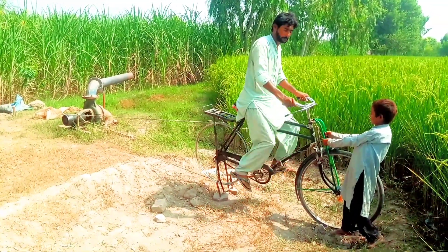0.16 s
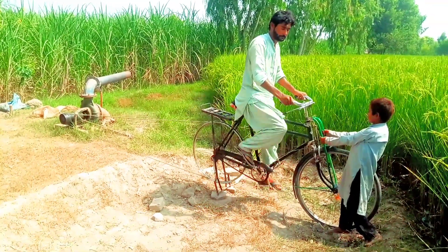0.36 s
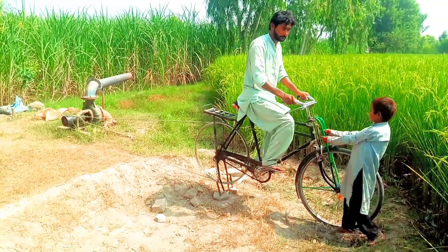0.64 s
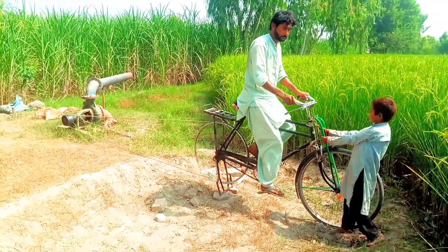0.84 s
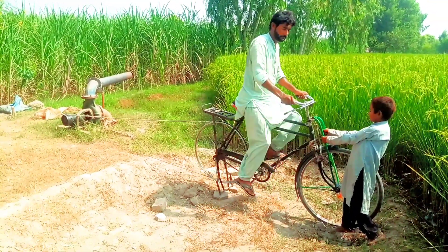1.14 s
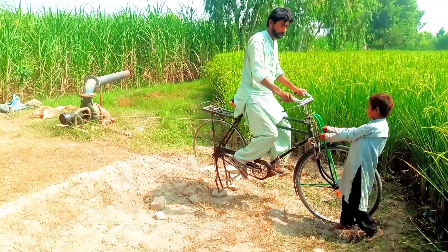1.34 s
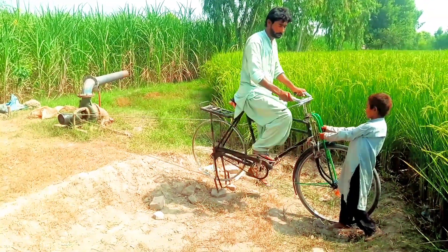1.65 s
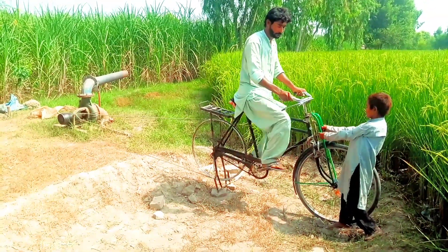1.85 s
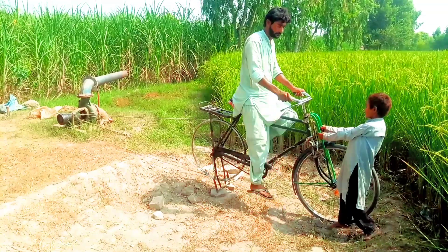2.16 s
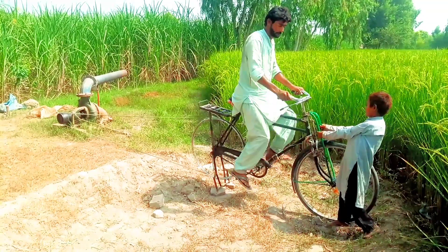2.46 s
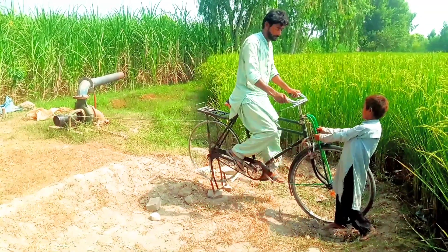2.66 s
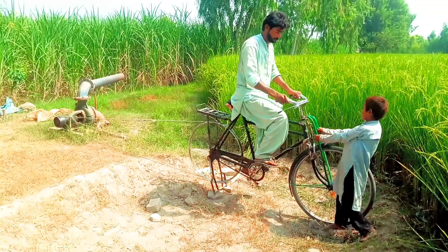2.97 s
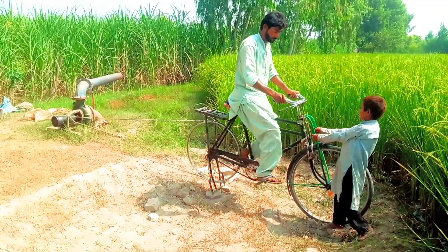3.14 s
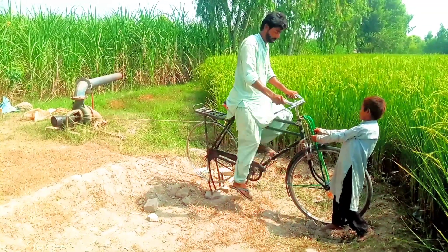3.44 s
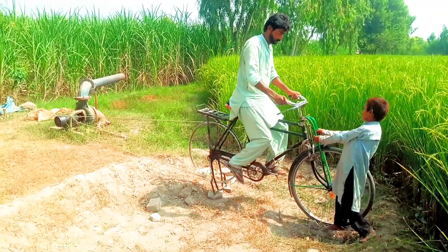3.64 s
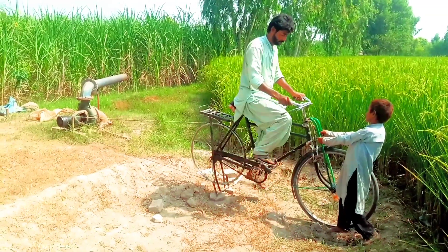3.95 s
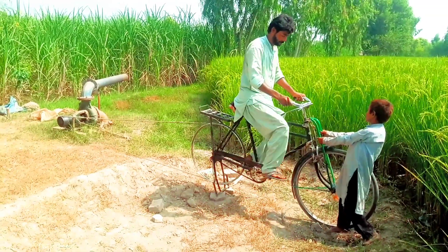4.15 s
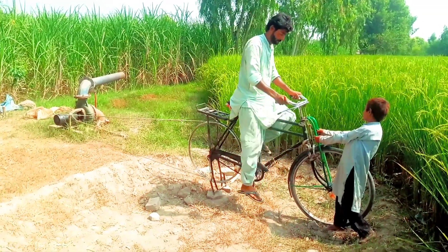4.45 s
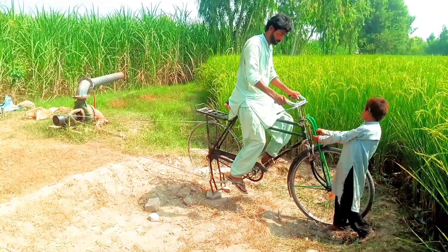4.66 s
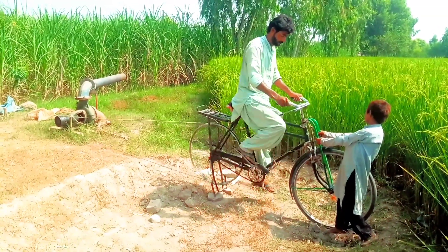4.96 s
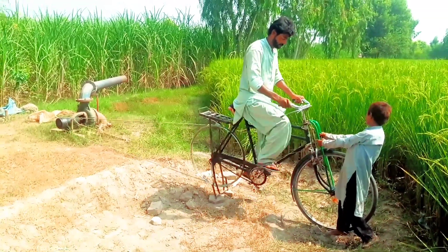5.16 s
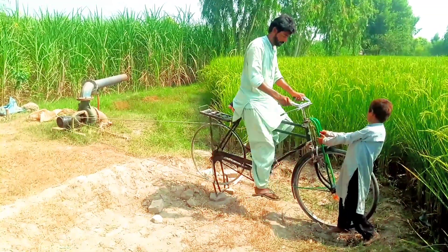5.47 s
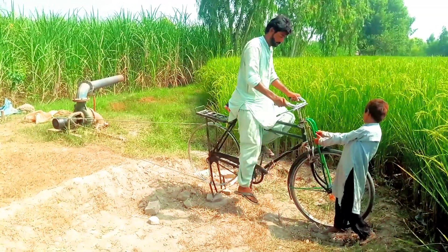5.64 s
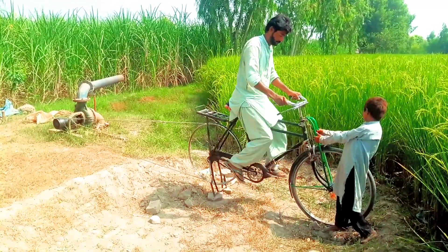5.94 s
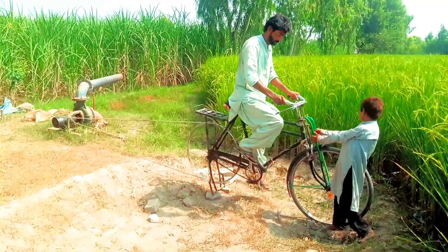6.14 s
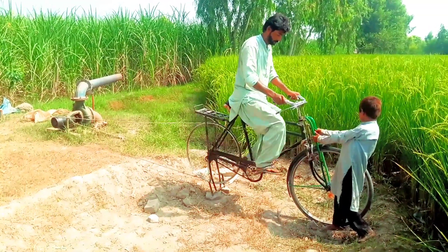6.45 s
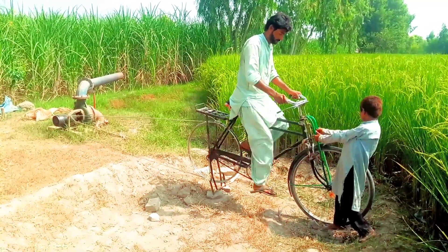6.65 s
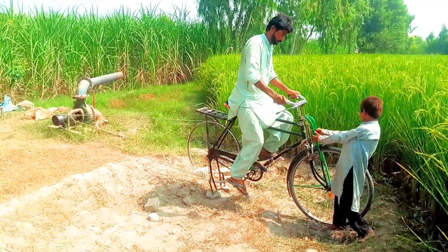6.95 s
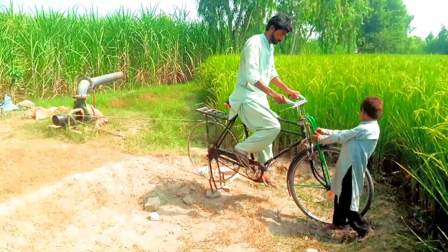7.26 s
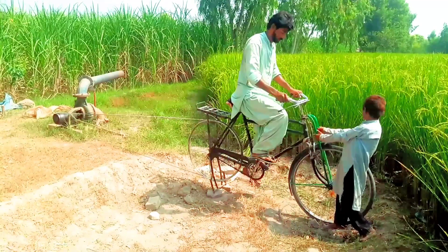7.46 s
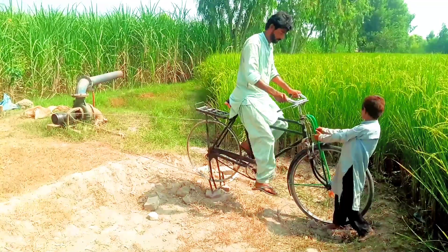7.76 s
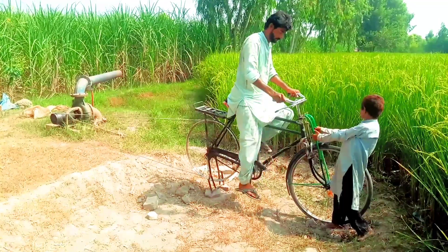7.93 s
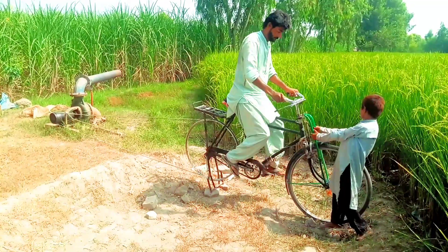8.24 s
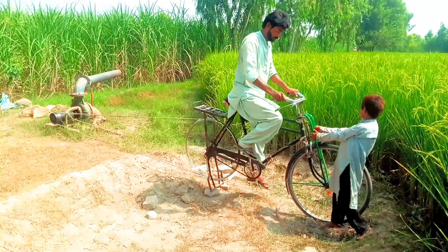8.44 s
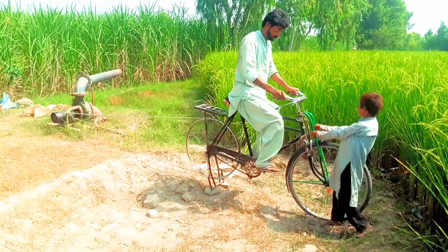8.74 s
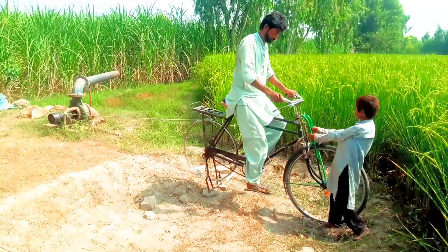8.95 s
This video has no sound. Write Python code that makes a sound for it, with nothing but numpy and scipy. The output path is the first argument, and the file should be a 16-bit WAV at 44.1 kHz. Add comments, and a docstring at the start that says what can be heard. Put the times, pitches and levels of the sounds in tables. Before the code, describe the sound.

A loose bicycle chain rattles and clashes brightly on steel in rapid pedal surges, with faint rim whirr, rope hiss and brief quiet dips outdoors.

```python
"""A loose bicycle chain rattles and clashes on steel, falling quiet for an instant when it pulls tight.
The bicycle stands in an open field and is pedalled hard; a rope round its bare rear rim turns a water pump.
Tiny random impacts ring the steel, the chain links and the rim; the rope also rubs with a noisy hiss.
A dry bearing chirps with wavering tones, the pump gulps and the stand creaks with noise through
resonances, and filtered noise makes the faint outdoor air."""
import sys
import numpy as np
from scipy import signal
from scipy.fft import rfft, irfft, next_fast_len
from scipy.io import wavfile
from scipy.ndimage import uniform_filter1d

SR = 44100
rng = np.random.default_rng(int(sys.argv[2]) if len(sys.argv) > 2 else 0)


def int16_out(signal):
    """Quantize to a 16-bit WAV file."""
    q = np.round(np.clip(np.atleast_2d(signal).T, -1, 1) * 32767)
    wavfile.write(sys.argv[1], SR, q.astype(np.int16))


N = 401294  # length in samples

# lulls while the chain is pulled tight: start_s, end_s, drop_db (change of the shaking, negative)
LULLS = [(1.29, 1.35, -2.5), (1.8, 1.853, -5), (2.32, 2.365, -4), (2.433, 2.492, -4), (3.463, 3.503, -14.5),
         (4.117, 4.147, -2), (4.564, 4.573, -5.5), (4.703, 4.75, -4.5), (5.693, 5.741, -15.5),
         (6.348, 6.415, -2.5), (6.885, 6.909, -11), (6.98, 7.072, -5), (8.017, 8.076, -13.5)]


def undb(db):
    """Turn decibels into gain."""
    return 10 ** (np.asarray(db) / 20)


def unit(x):
    """Scale to an average strength (rms) of 1."""
    return x / np.sqrt(np.mean(x ** 2))


def walk(rate):
    """Smooth random wandering, rms 1, that changes about rate times a second."""
    hold = max(int(SR / rate), 2)
    steps = np.repeat(rng.standard_normal(N // hold + 1), hold)
    return unit(uniform_filter1d(steps, hold)[:N])


def colour(x, points):
    """Filter to a given spectrum without sounding early, using the cepstrum of its log gain."""
    size = next_fast_len(N + SR // 10, True)
    point_hz, point_db = np.transpose(points)
    bin_hz = np.arange(size // 2 + 1) * SR / size
    gain_db = np.interp(np.log(bin_hz + 1), np.log(point_hz), point_db)
    cepstrum = irfft(np.log(undb(gain_db)), size)
    # folding the second half onto the first makes the response start at once
    cepstrum[1:size // 2] *= 2
    cepstrum[size // 2 + 1:] = 0
    response = np.exp(rfft(cepstrum))
    return irfft(rfft(x, size) * response, size)[:N]


def ring(x, hz, width_hz):
    """One resonance, gain 1 at its centre; the narrower it is, the longer it rings."""
    return signal.lfilter(*signal.iirpeak(hz, hz / width_hz, fs=SR), x)


def band(x, lo_hz, hi_hz, order):
    """Keep the sound between two pitches; a higher order gives steeper edges."""
    return signal.sosfilt(signal.butter(order, [lo_hz, hi_hz], "band", fs=SR, output="sos"), x)


def contacts(rate, spread_db):
    """Tiny impacts at random moments, about rate a second, of uneven size and either sign; rms 1."""
    happens = rng.random(N) < rate / SR
    size = undb(spread_db * np.clip(rng.standard_normal(N), -2, 2))
    return unit(happens * rng.choice([-1, 1], N) * size)


def strike(force, modes, wander_db, wander_rate):
    """Every impact feeds each mode differently; the place of contact wanders and favours other modes."""
    at = np.flatnonzero(force)
    out = np.zeros(N)
    weights = rng.standard_normal((len(at), len(modes)))
    places = rng.standard_normal((int(wander_rate * N / SR) + 2, len(modes)))
    for (hz, width_hz, db), weight, place in zip(modes, weights.T, places.T):
        favour = np.interp(at / SR * wander_rate, np.arange(len(place)), place)
        push = np.zeros(N)
        push[at] = force[at] * weight * undb(wander_db * favour)
        out += undb(db) * ring(push, hz, width_hz)
    return out


def fade(kicks, fall_s):
    """Each kick rises at once and dies away, to about a third in fall_s."""
    return signal.lfilter([1], [1, -np.exp(-1 / (fall_s * SR))], kicks)


def flurries(rate, fall_s, spread_db, steady):
    """Irregular surges with a sharp start, over a steady share; rms 1."""
    gap, size = rng.standard_normal((2000, 2)).T
    at = (np.cumsum(np.exp(.4 * gap)) * SR / rate).astype(int)
    inside = at < N
    kicks = np.zeros(N)
    kicks[at[inside]] = undb(spread_db * np.clip(size, -2, 2))[inside]
    return unit(steady + unit(fade(kicks, fall_s)))


def bursts(events, width_hz, swell_s):
    """Short bursts of turbulence or friction, each through one resonance twice."""
    out = np.zeros(N)
    t = np.arange(SR // 4) / SR
    for s, db, hz, ring_s in events:
        envelope = (1 - np.exp(-t / swell_s)) * np.exp(-np.log(1000) * t / ring_s)  # -60 dB in ring_s
        churn = rng.standard_normal(len(t)) * envelope
        burst = ring(ring(churn, hz, width_hz), hz, 2 * width_hz)
        start = int(s * SR)
        out[start:start + len(t)] += (undb(db) * burst / np.abs(burst).max())[:N - start]
    return out


def pedalling(column, coast_db):
    """Every stroke swells and fades in a bell shape above the level of the coasting wheel."""
    # pedal strokes: peak_s, length_s, rattle_db and whirr_db (before each sound's own trim)
    strokes = [(0.366, .62, -32.5, -53.5), (.92, 0.23, -34, -52.5), (1.506, 0.27, -33.5, -51),
               (2.15, 0.2, -31, -56), (2.748, 0.34, -33, -53), (3.21, 0.67, -34, -54),
               (3.84, 0.35, -34, -52.5), (4.358, 0.19, -32, -55), (4.896, .22, -32.5, -50),
               (5.32, 0.43, -34.5, -53.5), (6.157, 0.29, -36.5, -54.5), (6.719, .14, -28, -49),
               (7.268, 0.2, -29.5, -50.5), (7.66, 0.39, -32, -62), (8.487, 0.37, -34, -53.5),
               (8.95, .3, -42, -62)]
    rise_share = 0.49  # share of a stroke before its peak
    t = np.arange(N) / SR
    power = undb(coast_db) ** 2
    for stroke in strokes:
        since = t - stroke[0]
        width_s = stroke[1] * np.where(since < 0, rise_share, 1 - rise_share)
        power = power + undb(stroke[column]) ** 2 * np.exp(-(since / width_s) ** 2)
    return np.sqrt(power)


def slack():
    """Freedom of the chain to shake: full while loose, small while taut."""
    tighten_s = 0.048  # tension builds over this time, centred on the start of a lull, and goes at once
    t, db = np.arange(N) / SR, 0
    for start_s, end_s, drop_db in LULLS:
        tension = np.clip((t - start_s) / tighten_s + .5, 0, 1) * (t < end_s)
        db = db + drop_db * tension
    return undb(db)


def agitation():
    """How hard the chain shakes: with each stroke, and on release, the more the tighter it was."""
    recoil_db, recoil_fall_s = -49.5, 0.11  # the depth of the lull adds to the level
    kicks = np.zeros(N)
    for _, end_s, drop_db in LULLS:
        kicks[int(end_s * SR)] = undb(recoil_db - drop_db)
    return np.hypot(pedalling(column=2, coast_db=-37), fade(kicks, recoil_fall_s))


def chain(shake, slaps, touch, steel_db=-0.5, links_db=-17.5, click_db=-10.5,
          slap_click_db=-4.5, shake_db=0.2, stray_db=-11.5):
    """Link impacts ring the steel and the links and click drily; lighter slaps fall at random."""
    # resonances of the struck steel: pitch_hz, width_hz, relative level_db
    steel_modes = [(2252, 140, -16.5), (2833, 50, -12), (2965, 48, -6.5), (3048, 46, -7.5),
                   (3247, 43.5, -4), (3566, 37, -5), (3604, 40, 0), (3648, 63, -1), (3866, 70, -4),
                   (3980, 50, -2), (4280, 45, -2.5), (4321, 42, -1), (4390, 70, -13.5), (4566, 34, -0.5),
                   (4614, 69, -3), (4690, 25, -5.5), (4654, 63, -12), (4970, 36, 0.5), (4997, 43, -2.5),
                   (5026, 32, -1.5), (5180, 51, -8.5), (5270, 28, -3), (5400, 44, -1.5), (5450, 30, -7),
                   (5780, 64, -9.5), (5800, 77, -19.5), (6075, 67, -10), (6200, 67, -10), (6625, 66, -14)]
    # resonances of the small links and sprocket teeth: pitch_hz, width_hz, relative level_db
    link_modes = [(7190, 16, 3.5), (7310, 97, -1.5), (7460, 85, -1.5), (8040, 63, -6), (8480, 65, -6.5),
                  (9130, 88, -5.5), (9480, 41, -5), (9660, 74, -6), (10060, 110, -7), (10360, 68, -12),
                  (10620, 88, -14), (11170, 130, -18), (12000, 200, -16)]
    # spectrum of the dry clicks: pitch_hz, relative level_db
    click_spectrum = [(500, -49), (700, -24.5), (1400, -11), (2000, -6.5), (2600, -1), (4000, 0), (6000, 3),
                      (7000, -4.5), (8500, -11.5), (10000, -12.5), (11200, -15), (13000, -28.5),
                      (16000, -10)]
    loose = shake * slack() * touch
    stray = undb(stray_db) * loose * flurries(rate=24, fall_s=0.007, spread_db=1.7, steady=0)
    slaps = np.hypot(slaps, stray)
    shaking = undb(shake_db) * loose * flurries(rate=120, fall_s=0.012, spread_db=5.5, steady=1.0)
    impacts = contacts(rate=2800, spread_db=2.5)
    force = np.hypot(shaking, slaps) * impacts
    # a heavy slap presses longer than a light tick, so less of it goes into the bright parts
    ticks = np.hypot(shaking, undb(slap_click_db) * slaps) * impacts
    steel = band(strike(force, steel_modes, wander_db=2.5, wander_rate=20), 2160, 7250, order=3)
    links = band(strike(ticks, link_modes, wander_db=3.5, wander_rate=14), 5700, 12800, order=2)
    clicks = colour(ticks, click_spectrum)
    mix = undb(steel_db) * unit(steel) + undb(links_db) * unit(links) + undb(click_db) * unit(clicks)
    return np.std(force) * mix


def rope(shake, slaps, touch, whirr_db=0.5, hiss_db=5.0, stall=0.72, jolt_db=-25.0, patchy_db=2.0):
    """Rope fibres catch and slip: the rim whirrs, the rubbing hisses, a taut chain falters both; slaps jolt the rim."""
    # resonances of the rim and stand: pitch_hz, width_hz, relative level_db
    rim_modes = [(607.5, 29, -9), (669.5, 18.6, -5), (847, 59, -6), (892.3, 36, 2), (1071, 45, -2.5),
                 (1172, 36, -9), (1275, 48, -7.5), (1606, 60, -1.5), (1752, 52, 2)]
    # spectrum of the rubbing: pitch_hz, relative level_db
    hiss_spectrum = [(5000, -28), (9000, -10), (9600, -20), (10300, -8.5), (12000, -13), (13800, -13),
                     (14700, 0), (15700, -2.5)]
    # rubbing against chain shaking, before hiss_db is added: time_s, level_db
    hiss_level = [(0, -17), (.5, -23.5), (.63, -10), (.8, -21), (1.24, -12), (1.55, -24), (1.75, -20),
                  (2.3, -24.5), (4.7, -23), (4.9, -24), (5.55, -20), (6.1, -20), (6.7, -24), (8.7, -23),
                  (8.88, -13), (9.1, -28)]
    grip = flurries(rate=60, fall_s=0.018, spread_db=3.0, steady=1.0) * slack() ** stall * touch
    whirr = grip * pedalling(column=3, coast_db=-53) * undb(whirr_db)
    force = np.hypot(whirr, slaps * undb(jolt_db)) * contacts(rate=2200, spread_db=2.5)
    rim = band(strike(force, rim_modes, wander_db=2.3, wander_rate=22), 590, 1960, order=5)
    rubbing = grip * undb(patchy_db * walk(16)) * rng.standard_normal(N)
    hiss = unit(colour(rubbing, hiss_spectrum))
    time_s, level_db = np.transpose(hiss_level)
    hiss_gain = undb(np.interp(np.arange(N) / SR, time_s, level_db) + hiss_db)
    return np.std(force) * unit(rim) + hiss * shake * hiss_gain


def field(db=-68.0, rumble_db=-12, sway_db=3.0):
    """Faint outdoor air is filtered noise; light gusts sway its low rumble."""
    # spectrum of the air: pitch_hz, relative level_db
    air_spectrum = [(20, -13), (35, -20), (60, -9), (110, -4), (220, -5.5), (460, -6.5), (800, -2.5),
                    (3000, -0.5), (16000, -24)]
    air = unit(colour(rng.standard_normal(N), air_spectrum)) * undb(1.2 * walk(2.1))
    rumble = unit(band(rng.standard_normal(N), 53, 200, order=2)) * undb(rumble_db + sway_db * walk(19))
    return undb(db) * (air + rumble)


def bearing(waver=0.0046, rough_db=7.5):
    """Dry metal squeals in short tones of unsteady pitch and loudness."""
    # chirps: start_s, length_s, pitch_hz and level_db (both the centre of the wavering)
    chirps = [(.04, 0.13, 15360, -58), (1.1, 0.098, 9400, -60), (1.18, 0.032, 14880, -52),
              (1.71, .05, 14880, -55), (2.43, 0.036, 9400, -58), (2.45, .05, 14880, -61),
              (3.478, 0.058, 9400, -57.5), (4.545, .025, 13140, -73), (5.71, .03, 13140, -64),
              (5.71, 0.087, 9570, -57), (5.724, .02, 5480, -47), (6.96, 0.046, 13000, -58),
              (8.04, .035, 5530, -51), (8.06, 0.083, 9460, -50), (8.085, .04, 14890, -51)]
    out = np.zeros(N)
    drift = 1 + waver * walk(150)
    grip = undb(rough_db * walk(200))
    for s, length_s, hz, db in chirps:
        span = slice(int(s * SR), int((s + length_s) * SR))
        tone = np.sin(2 * np.pi * np.cumsum(hz * drift[span]) / SR)
        out[span] += undb(db) * signal.windows.tukey(len(tone), .5) * grip[span] * tone
    return out


def pump(gurgle_db=-75.0, gulp_db=-3.0):
    """Water gurgles unevenly through the hollow casing, with a few larger gulps."""
    # gulps: start_s, peak_db (before gulp_db is added), pitch_hz, ring_s (fall of the driving noise)
    gulps = [(.1, -55, 233, 0.11), (.395, -49, 301, .18), (.575, -46, 380, 0.17), (.936, -42.5, 510, 0.034),
             (1.244, -48.5, 302, .12), (2.75, -53, 401, 0.15), (3.823, -53, 307, 0.24),
             (4.77, -55, 380, 0.11), (5.247, -44, 368, 0.045), (8.08, -57, 200, 0.14),
             (8.46, -56, 302, 0.13)]
    # hollow resonances of the casing and pipe: pitch_hz, width_hz, relative level_db
    casing_modes = [(307, 32, 0), (398, 31, -1), (480, 25, -6.5)]
    churn = undb(2.6 * np.clip(walk(14), -1.5, 1.5)) * contacts(rate=700, spread_db=1.5)
    gurgle = band(strike(churn, casing_modes, wander_db=6.5, wander_rate=12), 150, 710, order=2)
    return undb(gurgle_db) * unit(gurgle) + undb(gulp_db) * bursts(gulps, width_hz=137, swell_s=0.0082)


def slapping(fall_s, db, release_db, release_attack_s, lift_db, lift_s):
    """Before a slap the chain lifts a little; then several links land in quick succession and settle."""
    # louder slaps on the steel: peak_s, level_db (before db is added), attack_s (short = clean, long = glancing)
    slap_table = [(0.112, -29, 0.0022), (0.216, -22.5, 0.014), (0.296, -25, 0.012), (0.616, -21.5, 0.015),
                  (0.64, -19.5, 0.014), (0.716, -20, 0.002), (0.86, -27, 0.014), (0.9, -24, 0.016),
                  (0.964, -27.5, 0.014), (1.113, -36, 0.002), (1.161, -30.5, 0.014), (1.398, -19, 0.002),
                  (1.466, -27, 0.014), (1.546, -24, 0.019), (1.565, -19, 0.014), (1.898, -23.5, 0.002),
                  (1.982, -27.5, 0.014), (2.097, -19, 0.025), (2.39, -25, 0.014), (2.635, -21.5, 0.024),
                  (2.701, -28, 0.022), (2.857, -22.5, 0.011), (3.014, -23.5, 0.002), (3.061, -22.5, 0.027),
                  (3.145, -24, 0.002), (3.318, -21, 0.016), (3.57, -24, 0.0081), (3.722, -26.5, 0.002),
                  (3.759, -19, 0.0018), (3.816, -22, 0.014), (3.868, -23, 0.014), (3.913, -24.5, 0.024),
                  (4.163, -27, 0.002), (4.209, -22, 0.002), (4.25, -30, 0.002), (4.28, -23, 0.014),
                  (4.367, -18, 0.0018), (4.654, -30, 0.0018), (4.696, -27.5, 0.014), (4.774, -28, 0.013),
                  (4.835, -20.5, 0.0017), (4.881, -22, 0.017), (5.193, -23, 0.014), (5.257, -28, 0.012),
                  (5.306, -22.5, 0.015), (5.58, -25.5, 0.013), (5.78, -28.5, 0.014), (5.987, -26.5, 0.013),
                  (6.101, -23.5, 0.012), (6.157, -23.5, 0.0027), (6.261, -25.5, 0.012),
                  (6.475, -27.5, 0.014), (6.599, -24, 0.019), (7.086, -30.5, 0.013), (7.137, -28.5, 0.0017),
                  (7.222, -20, 0.0027), (7.267, -23.5, 0.018), (7.516, -25, 0.014), (7.656, -23.5, 0.017),
                  (7.694, -16, 0.002), (7.776, -23, 0.002), (8.158, -25, 0.033), (8.221, -29.5, 0.016),
                  (8.406, -27, 0.034), (8.488, -23, 0.002), (8.692, -27.5, 0.012), (8.789, -27.5, 0.012),
                  (8.908, -22.5, 0.002)]
    power, touch = np.zeros(N), np.ones(N)
    # the chain also drops back on the steel when its tension goes, the harder the tighter it was
    releases = [(end_s + release_attack_s, release_db - drop_db, release_attack_s)
                for _, end_s, drop_db in LULLS]
    since = np.arange(-SR // 20, SR // 10) / SR
    for s, level_db, attack_s in list(slap_table) + releases:
        at = int(s * SR)
        envelope = np.clip(1 + since / attack_s, 0, 1) * np.exp(-np.maximum(since, 0) / fall_s)
        start = at - SR // 20
        power[start:start + len(since)] += ((undb(level_db + db) * envelope) ** 2)[:N - start]
        touch[at - int(lift_s * SR):at] = undb(lift_db)
    return np.sqrt(power), touch


def stand(db=-4.0):
    """The stand creaks under the rider's weight: bursts of friction noise through a resonance."""
    # creaks: start_s, peak_db (before db is added), pitch_hz, ring_s (fall of the driving noise)
    creaks = [(.44, -30, 2400, 0.13), (3.815, -29, 2280, .12), (3.858, -26, 2280, 0.082),
              (6.16, -32.5, 2320, .12), (7.31, -33, 2350, 0.34)]
    return undb(db) * bursts(creaks, width_hz=220, swell_s=0.006)


def scene():
    """Open air: everything arrives directly, without echo."""
    shake = agitation()
    slaps, touch = slapping(fall_s=0.0074, db=-1.85, release_db=-46.0, release_attack_s=0.004,
                            lift_db=-1.0, lift_s=0.017)
    moving = chain(shake, slaps, touch) + rope(shake, slaps, touch)
    return (moving + field() + bearing() + pump() + stand())[None]  # one channel


def record(dry):
    """A steep filter cuts the very top of the treble."""
    top_hz = 15750
    return signal.sosfilt(signal.ellip(12, .2, 80, top_hz, fs=SR, output="sos"), dry)


dry = scene()
out = record(dry)
int16_out(out)
```